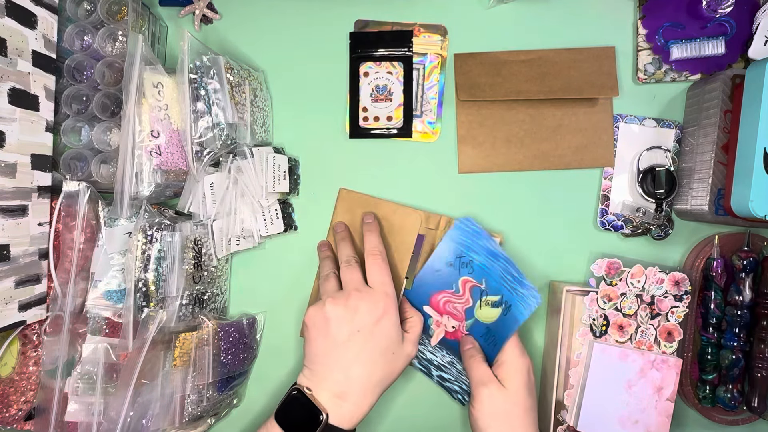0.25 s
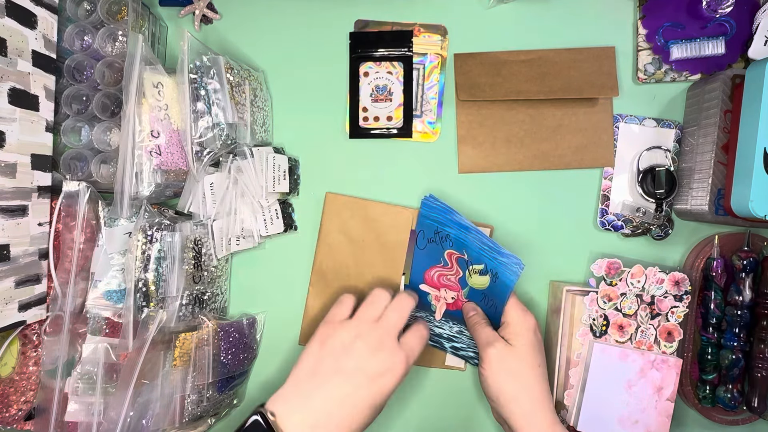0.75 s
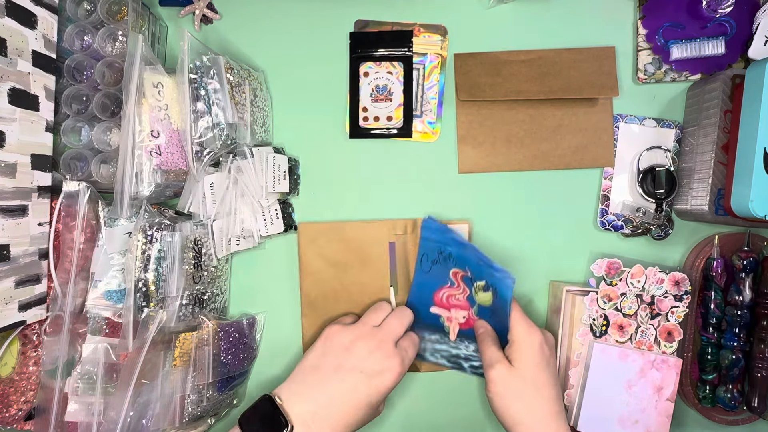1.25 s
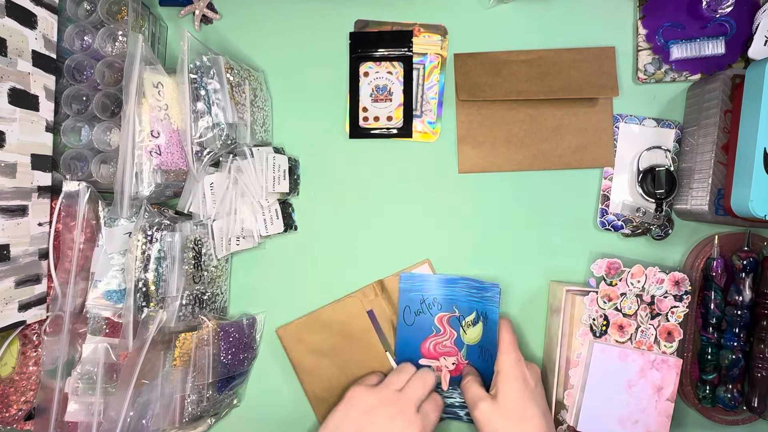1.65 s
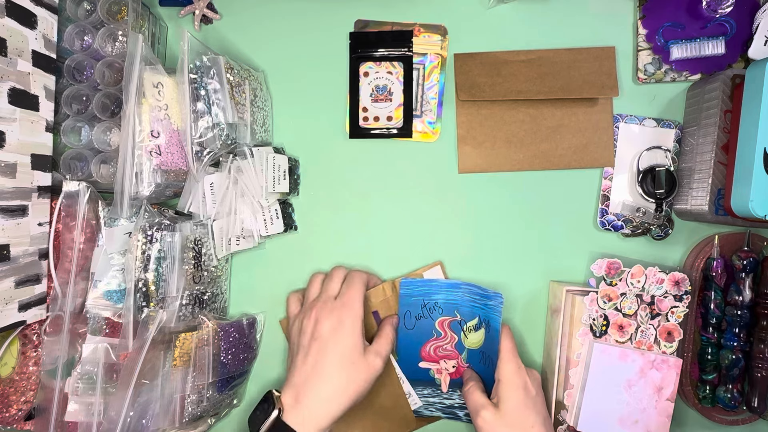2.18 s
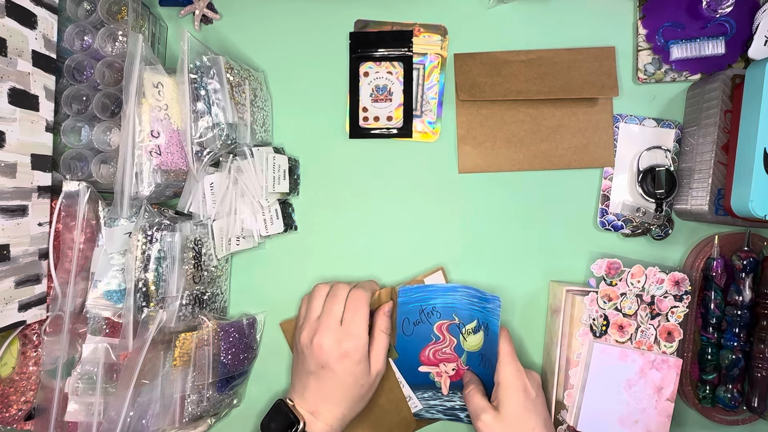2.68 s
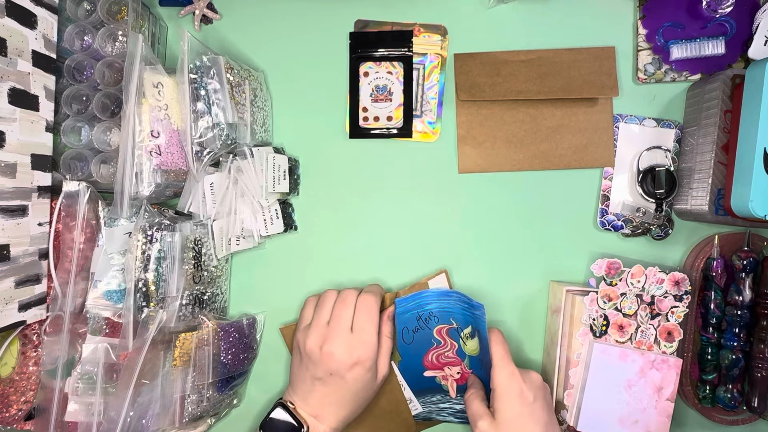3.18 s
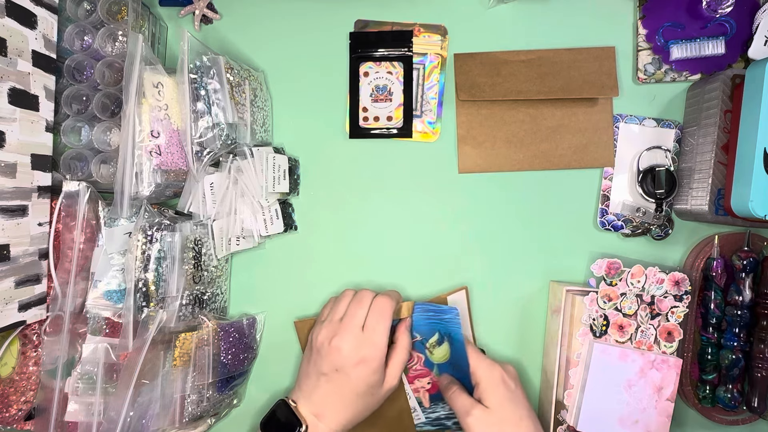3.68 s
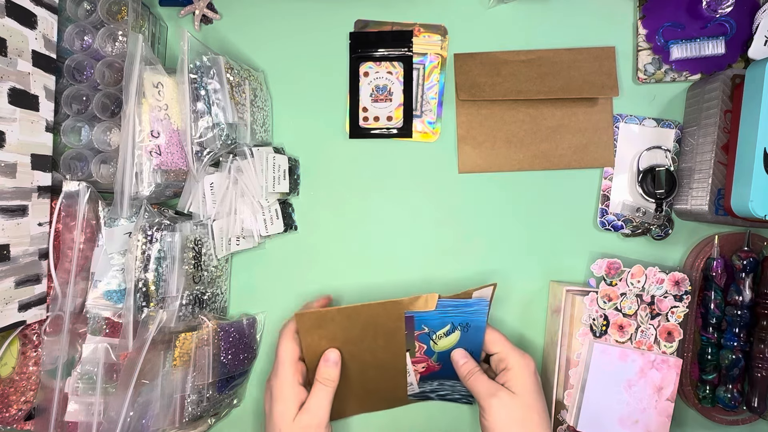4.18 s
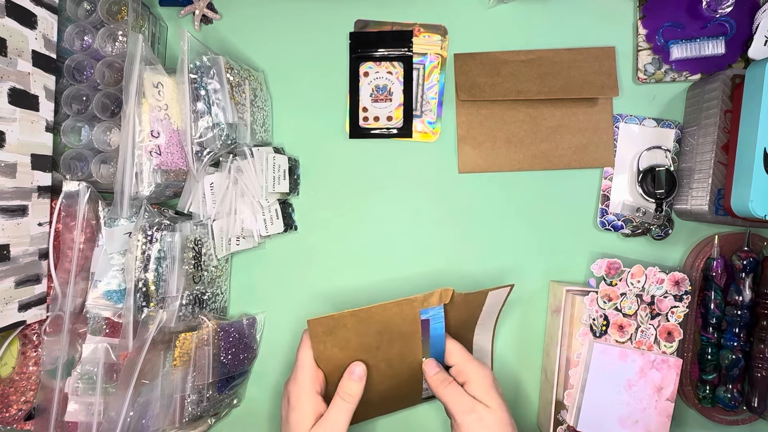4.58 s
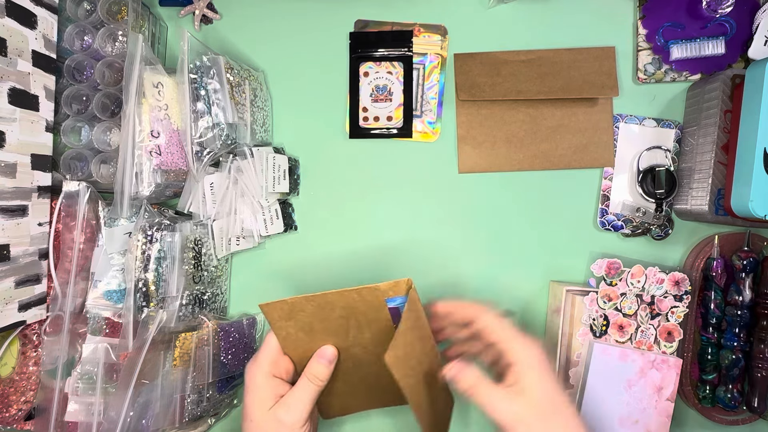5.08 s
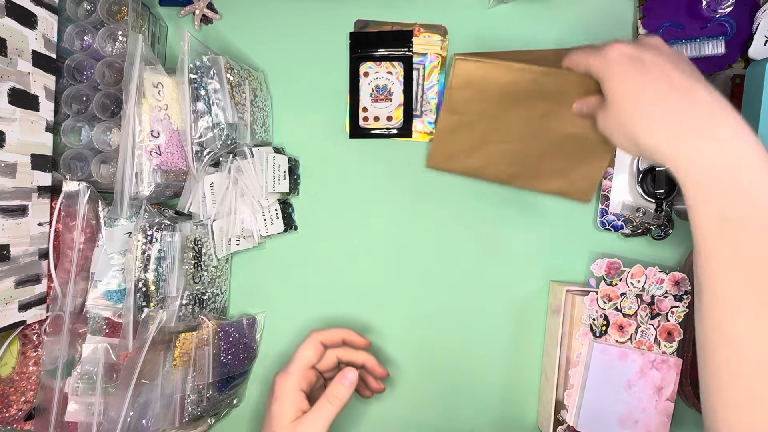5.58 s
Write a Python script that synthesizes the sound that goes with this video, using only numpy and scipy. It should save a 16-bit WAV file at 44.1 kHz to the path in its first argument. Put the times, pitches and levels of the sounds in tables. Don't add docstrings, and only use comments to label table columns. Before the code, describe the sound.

A quiet small room with a steady low fan hum and soft ventilation rumble throughout. Close above a desk, stiff cards are lined up with a paper envelope: grainy dry scrapes in short uneven strokes from 0 to 1.7 s, with faint creases and bright edge flicks near 0.5, 1.0 and 1.3 s. A soft low wrist thud falls at about 1.9 s, then a crisp crease snap at 2.1 s and gentler crumpling to 3 s, with a thin flick at 2.8 s. At 3.25 s a bright sharp flick and bend begin the push; sliding rustles continue, swelling to the loudest crack at about 4.46 s. Firm folds and dull knocks follow from 4.65 to 4.95 s, the stiff paper ringing briefly and hollowly. A tiny low puff sounds at 5.1 s as it closes. Light rustle fades, and small taps at 5.66 to 5.77 s mark the envelope being put down.

```python
import sys
import numpy as np
from scipy import signal
from scipy.fft import rfft, irfft, next_fast_len
from scipy.io import wavfile
from scipy.ndimage import uniform_filter1d

SR = 44100
rng = np.random.default_rng(int(sys.argv[2]) if len(sys.argv) > 2 else 0)


def master(y):
    cut = np.clip(np.atleast_2d(y).T, -1, 1)
    pcm = np.round(cut * 32767)
    wavfile.write(sys.argv[1], SR, pcm.astype(np.int16))


def undo_db(level):
    steps = np.asarray(level, float) / 20
    return 10 ** steps


N = 257981


def evened(x):
    return x / np.sqrt(np.mean(x ** 2) + 1e-20)


def read(points, hz):
    f, value = np.transpose(points)
    return np.interp(np.log(hz + 1), np.log(f + 1), value)


def coloured(x, points):
    size = next_fast_len(N)
    gain = undo_db(read(points, np.fft.rfftfreq(size, 1 / SR)))
    return evened(irfft(rfft(x, size) * gain, size)[:N])


def resonate(x, hz, width):
    r = np.exp(-np.pi * width / SR)
    return 2 * signal.lfilter([1 - r], [1, -r * np.exp(2j * np.pi * hz / SR)], x).real


def add(mix, s, sound):
    part = mix[..., round(s * SR):][..., :sound.shape[-1]]
    part += sound[..., :part.shape[-1]]


# [f/Hz, level/dB, halo width/Hz, steady share]
HUM = [(41.75, -60, 1.1, .1), (59.65, -52, 4.8, 13), (119.46, -48.5, 7.8, 2.8), (93.4, -55.5, 8.2, 0.25),
       (150, -57.5, 15.8, 0.058)]


def hum():
    t = np.arange(N) / SR
    out = 0
    for hz, db, width, steady in HUM:
        halo = resonate(rng.standard_normal(N), hz, width)
        halo = evened(resonate(halo, hz, 3 * width))
        tone = np.sin(2 * np.pi * (hz * t + rng.random()))
        out = out + undo_db(db) * evened(steady * tone + halo)
    return out * undo_db(np.array([[-1.1], [1.1]]))


# [f/Hz, level per Hz/dB]
AIR = [(15, -25), (25, 4.5), (137, -7), (175, -11.5), (405, -21), (887, -30.5), (1500, -22), (2600, -38),
       (6200, -40.5), (8000, -52), (12500, -58)]
AIR_DB = -48.5
# [f/Hz, likeness 0-1]
SAME = [(40, 1), (130, 0.7), (290, 0.61), (640, 0.043), (3000, 0.11), (15000, .05)]


def air():
    size = next_fast_len(N)
    hz = np.fft.rfftfreq(size, 1 / SR)
    a, b = rfft(rng.standard_normal((2, size)))
    same = np.clip(read(SAME, hz), 0, 1)
    right = same * a + np.sqrt(1 - same ** 2) * b
    z = np.array([a, right]) * undo_db(read(AIR, hz))
    return undo_db(AIR_DB) * evened(irfft(z, size)[:, :N])


# [peak t/s, effort level/dB, rise/s, fall/s, edge sharpness/dB]
LINING_UP = [(0.0, -55, 0.1, 0.08, -2), (0.085, -47, 0.066, 0.11, -5), (0.39, -56.5, 0.37, 0.18, -8),
             (0.537, -47, 0.036, 0.012, 2), (0.63, -57, 0.089, 0.059, 1.5), (0.815, -51, 0.047, 0.097, -11),
             (0.918, -54, 0.013, 0.098, -0.5), (1.025, -45.5, 0.012, 0.036, -17),
             (1.12, -55.5, 0.049, 0.61, -0.5), (1.30, -54, 0.042, 0.039, -2),
             (1.475, -61.5, 0.016, 0.08, -8), (1.525, -46, 0.057, 0.11, -8), (1.6, -48.5, 0.093, 0.025, -7),
             (1.66, -60.5, 0.021, 0.033, 9.5), (2.07, -58, 0.14, 0.051, 2.5), (2.15, -58, 0.024, 0.32, -3),
             (2.328, -53.5, 0.034, 0.19, -1), (2.56, -58.5, 0.063, 0.073, -6),
             (2.691, -58, 0.087, 0.061, 2), (2.794, -54, 0.004, 0.006, 21), (2.87, -63, 0.14, 0.39, -38),
             (3.029, -58, 0.15, 0.041, -7.5), (1.9, -68, 0.011, 0.067, -5), (1.975, -63.5, 0.014, 0.05, 1)]
PUSHING_IN = [(3.251, -45, 0.016, 0.045, -15), (3.31, -60.5, 0.069, 0.23, -34),
              (3.448, -50, 0.045, 0.15, 0.5), (3.58, -51, 0.07, 0.037, -5), (3.70, -50, 0.19, 0.14, -6.5),
              (3.84, -56, 0.025, 0.11, 0), (4.27, -55.5, 1, 0.099, -9.5), (4.35, -53.5, 0.065, 0.093, 5.5),
              (4.419, -40.5, 0.1, 0.066, -3.5), (4.48, -44.5, 0.035, 0.038, -5.5),
              (4.63, -58.5, 0.33, 0.066, -21), (4.76, -49.5, 0.081, 0.1, 1.5),
              (4.82, -51.5, 0.13, 0.12, -29), (5.107, -53, 0.0042, 0.022, -5), (5.159, -54, 0.042, .1, -3),
              (5.38, -62, 0.18, 0.33, -6.5), (5.67, -58.5, 0.018, 0.11, -4),
              (5.771, -61.5, 0.094, 0.17, -4), (3.905, -56.5, 0.021, 0.029, 1),
              (3.231, -45.5, 0.011, 0.023, -1)]
SWELL_DB, SWELL_ROUND, REST_DB = -17, 1.255, -90


def strokes():
    t = np.arange(0, N + 64, 64) / SR
    s, db, rise, fall, edge_db = np.array(LINING_UP + PUSHING_IN).T[..., None]
    away = np.where(t < s, (s - t) / abs(rise), (t - s) / abs(fall))
    swell = undo_db(db + np.maximum(SWELL_DB * away ** SWELL_ROUND, -120))
    curves = (swell, swell * undo_db(edge_db))
    return [np.interp(np.arange(N) / SR, t, e.sum(0) + undo_db(REST_DB)) for e in curves]


def slips(per_s, spread_db, clump_db):
    size = undo_db(spread_db * np.minimum(rng.exponential(1, N), 4)) * rng.choice([-1, 1], N)
    clumps = uniform_filter1d(rng.standard_normal(N), size=300)
    clumps = evened(uniform_filter1d(clumps, size=300))
    return evened(size * (rng.random(N) < per_s / SR)) * undo_db(clump_db * clumps)


def wide(points, alike, **grain):
    near, far = slips(**grain), slips(**grain)
    right = alike * near + np.sqrt(1 - alike ** 2) * far
    return np.array([coloured(near, points), coloured(right, points)])


def patchy(x):
    z = signal.stft(x, nperseg=256)[2]
    field = uniform_filter1d(rng.standard_normal(z.shape[1:]), size=3, axis=0)
    field = uniform_filter1d(field, size=14, axis=1)
    patch_db = 2.5 * evened(field)
    return evened(signal.istft(z * undo_db(patch_db), nperseg=256)[1][:, :N])


# [f/Hz, level per Hz/dB]
FIBRE = [(600, -79), (1000, -11.5), (1250, -2), (1900, -1.5), (2500, -4), (3000, -6.5), (4800, -7.5),
         (6300, -6.5), (8800, -16.5), (10000, -25)]
EDGE = [(7000, -12.5), (9000, 8.5), (10100, -2), (11200, 0.5), (12500, -6), (13600, 2.5), (14600, -5),
        (16000, -6)]
SHEET = [(150, -30), (300, -6), (600, 0), (1100, -1), (1500, -10), (2500, -30)]
# [t/s, grip level/dB]
GRIP = [(0, -51), (.8, -50.5), (1.3, -54.5), (1.8, -49.5), (2.3, -51.5), (2.9, -51.5), (3.4, -51.5),
        (4.0, -51), (4.4, -53), (4.7, -44), (5.0, -46), (5.3, -44), (5.6, -50), (5.85, -55)]
SHEET_FOLLOWS = 0.53


def scrape(effort, pressure):
    grip_db = np.interp(np.arange(N) / SR, *np.transpose(GRIP))
    fibres = patchy(wide(FIBRE, alike=0.17, per_s=6000, spread_db=2.4, clump_db=1.4)) * undo_db(2.0)
    edge = coloured(slips(per_s=3800, spread_db=-7.0, clump_db=1.5), EDGE)
    sheet = wide(SHEET, alike=0.19, per_s=2100, spread_db=0.6, clump_db=2.0) * undo_db(grip_db - 6.5)
    flex = (effort / undo_db(-49.0)) ** SHEET_FOLLOWS
    return effort * fibres + pressure * edge + flex * sheet


# [start t/s, length/s, ring level above effort/dB, first f/Hz, last f/Hz]
POCKET = [(0.034, 0.18, 9, 1440, 1380), (0.47, 0.084, -12, 2000, 2200), (0.769, 0.045, 15, 1600, 1510),
          (0.805, 0.066, 13.5, 2050, 2100), (1.289, 0.045, 6, 1580, 1420), (1.452, 0.18, -1, 2270, 1810),
          (3.35, 0.2, 8.5, 1740, 1530), (3.6, 0.28, 9, 1570, 1780), (4.26, 0.24, 8, 2570, 2590),
          (4.789, 0.07, 15.5, 1290, 1240), (0.908, 0.06, 4, 4540, 4660), (1.124, 0.05, 13, 4900, 4860),
          (1.285, 0.04, 1, 5100, 5000), (1.462, 0.037, 11, 2300, 2500), (1.563, 0.062, 8.5, 4630, 4700),
          (2.12, 0.06, 5, 5100, 4900), (4.755, 0.069, 12, 2510, 2650), (0.04, 0.074, 1, 2400, 2280),
          (0.24, 0.18, 7, 1320, 1290), (0.2, 0.25, 9.5, 2900, 2830), (2.127, 0.12, 13, 1490, 1450),
          (2.245, 0.47, 10.5, 1300, 1250), (2.503, 0.14, 9, 2500, 2450), (2.75, 0.35, 7.5, 1280, 1290),
          (2.736, 0.2, 13.5, 2030, 1930), (2.85, 0.11, 11.5, 2550, 2680), (3.43, 0.33, 4, 2620, 2600),
          (4.69, 0.36, 12, 2000, 2000), (4.28, 0.13, -7, 1280, 1330)]


def pocket(effort):
    out = np.zeros(N)
    rub = slips(per_s=1800, spread_db=2.8, clump_db=1.6)
    for s, length, db, first_hz, last_hz in POCKET:
        span = slice(round(s * SR), round((s + length) * SR))
        glide_hz = np.linspace(first_hz, last_hz, len(rub[span]))
        turn = np.exp(2j * np.pi * np.cumsum(glide_hz) / SR)
        ring = (turn * signal.lfilter(*signal.butter(2, 130, fs=SR), rub[span] / turn)).real
        fade = signal.windows.tukey(len(ring), .25)
        add(out, s, evened(ring) * effort[span] * undo_db(db - 13.0) * fade)
    return out


def burst(chance, hz, fall_db, width_share, rise_s):
    t = np.arange(len(chance)) / SR
    fall_db = max(fall_db, 3)
    fall = undo_db(-fall_db * t / 0.007) + 0.061 * undo_db(-fall_db * t / 0.13)
    blow = chance * fall * np.minimum(t / rise_s, 1)
    ring = resonate(resonate(blow, hz, width_share * hz), hz, 2.9 * hz)
    ring = ring + 0.17 * resonate(blow, min(1.53 * hz, 15000), .5 * hz)
    return ring / abs(ring).max()


def snaps(table, fall_db, rise_s):
    out = np.zeros((2, N))
    rattle = rng.standard_normal((len(table), 5000))
    give = 8.6 * signal.unit_impulse(5000, idx=30)
    for noise, (s, db, hz, pan_db) in zip(rattle + give, table):
        sound = undo_db(db - 3.0) * burst(noise, hz, fall_db, width_share=0.23, rise_s=rise_s)
        add(out, s - .0007, sound * undo_db(np.array([[pan_db / 2], [-pan_db / 2]])))
    return out


# [t/s, peak level/dB, ring f/Hz, left-right level/dB]
SNAPS = [(0.0568, -34.5, 1300, 9.5), (0.35, -41, 1330, -10), (0.7632, -48, 1550, -17),
         (0.818, -31.5, 2160, -8), (0.8265, -33, 1960, -12), (1.0249, -42, 1920, -7),
         (1.4655, -36, 1890, -1), (1.521, -29.5, 1820, 4), (1.675, -39.5, 2100, -15),
         (2.1038, -17, 1480, 1), (2.1115, -26.5, 1400, -9), (2.2381, -33, 1110, -4),
         (2.3992, -31, 2000, -4), (3.2306, -26, 2320, 0), (3.2472, -25.5, 1310, -6),
         (3.2553, -23.5, 1790, -10), (3.7345, -28.5, 1510, -1), (3.5862, -25, 1360, -3),
         (3.8022, -27.5, 1610, -4), (4.4135, -29, 2520, -6), (4.4618, -17.5, 1400, -3),
         (4.4634, -9.5, 2580, -7.5), (4.4697, -24, 1930, 4), (4.7312, -25.5, 1930, -1),
         (4.7715, -27, 2500, 0), (4.8125, -22.5, 1320, 7), (4.82, -18.5, 1310, -7),
         (4.9551, -37.5, 1050, -5), (5.034, -42, 1440, -10), (5.1058, -38, 1270, 4),
         (5.66, -33, 1050, -17.5)]
TICKS = [(1.1, -41, 1300, -10), (1.4791, -33, 2370, -2), (1.3, -42, 1500, -2), (2.1215, -46, 1450, -2),
         (2.139, -45, 1500, -2), (2.5, -35, 1500, -4), (2.8, -43, 1500, -2), (2.249, -39, 1150, 1),
         (3.2, -48, 1250, -2), (1.8, -42, 1300, -4), (3.2, -42, 1230, -9), (2.5, -40, 2000, -3),
         (2.865, -38.5, 1300, -8), (3.272, -34, 1030, 3), (3.2, -28, 1310, -8), (4.662, -27.5, 1390, -6),
         (4.8164, -30, 2720, 7), (0.764, -41, 2300, 0), (5.6585, -34, 3050, -11), (4.4623, -16, 2060, 0),
         (4.477, -28, 2200, 0), (0.95, -31, 3040, 0), (4.9, -36, 2550, 0), (4.357, -33, 2900, 0),
         (7.8, -40, 3000, -6), (4.668, -26.5, 2370, 0), (4.828, -25.5, 1280, -3), (0.528, -37, 2500, -3),
         (0.533, -40, 2100, -1), (0.353, -46, 2050, -3), (0.33, -34, 2500, -2), (0.44, -38.5, 2700, -5),
         (0.098, -45, 2350, -3), (2.688, -35, 2550, -2), (4.5, -38, 3600, -2), (2.796, -36, 3600, -9),
         (4.4636, -15, 2200, 0), (4.4627, -31, 3800, -2), (4.4705, -31, 3900, -4), (4.4785, -36, 2700, -3),
         (5.112, -36, 1250, -4), (4.768, -28, 1340, -10), (1.8915, -48, 2700, -3), (0.86, -42, 2200, 3),
         (1.296, -44, 2000, -3), (0.84, -38, 2200, -4)]
CRUMPLES = [
    (1.5696, -38.5, 1770, -18),
    (2.2123, -31.5, 1400, -4),
    (2.3171, -42, 1330, -5),
    (2.684, -30.5, 1630, -3.5),
    (2.795, -44, 1420, -13),
    (3.0281, -45.5, 1450, -7),
    (3.2375, -29.5, 1480, 5),
    (4.6654, -27, 1980, -2),
    (5.7483, -41.5, 1390, -8),
    (5.76, -57, 1370, 6),
]


def creases():
    quick = snaps(SNAPS + TICKS, fall_db=23, rise_s=0.00085)
    slow = snaps(CRUMPLES, fall_db=6.5, rise_s=0.0017)
    return quick + slow


# [f/Hz, level/dB, width/Hz]
BODY = [(1110, -6.5, 22), (1242, 2.5, 19), (1390, -2, 19), (1530, -4, 64), (1870, -24, 14), (2000, 6, 7.3),
        (2090, -12.5, 20), (2320, -9, 55), (2520, -7, 140), (2690, -12, 23), (2930, -5, 63)]


def body(x):
    return sum((-1) ** k * undo_db(db) * resonate(x, hz, width) for k, (hz, db, width) in enumerate(BODY))


def hits(table, width_share, rise_s, boost_db):
    out = np.zeros(N)
    chance = rng.standard_normal((len(table), 5000))
    for noise, (s, db, hz, fall_db) in zip(chance, table):
        sound = burst(noise, hz, fall_db, width_share, rise_s)
        add(out, s - rise_s, undo_db(db + boost_db) * sound)
    return out


# [t/s, peak level/dB, centre f/Hz, fall per 7 ms/dB]
FLICKS = [(0.5259, -35, 6540, 15), (0.8148, -40, 6100, 20), (0.827, -57, 6290, 20),
          (1.0238, -29.5, 7100, 12), (1.295, -27, 5200, 10), (1.5174, -51, 4630, 11),
          (1.6683, -37, 4550, 14), (1.9834, -47.5, 8800, 13), (2.104, -23.5, 4930, 57),
          (2.6827, -36, 4700, 5), (2.7912, -27, 9800, 35), (2.7955, -27, 8700, 37), (2.797, -34, 4900, 25),
          (3.2281, -39, 7400, 11), (3.2479, -14, 4800, 26), (3.2584, -46, 4100, 18),
          (3.5858, -42, 4420, 18), (4.4608, -46, 4020, 18), (5.1043, -55, 5160, 15),
          (5.105, -44, 12800, 15), (5.145, -39.5, 12800, 4.5), (5.142, -43.5, 4600, 10),
          (5.659, -42.5, 5600, 0), (2.798, -36, 5150, 24), (2.812, -50, 5200, 5), (2.7955, -30, 12900, 34),
          (1.0240, -38, 13500, 30), (1.8915, -58, 6000, 10), (1.9652, -50, 8500, 10),
          (2.0076, -50, 9000, 9), (3.2285, -45, 12700, 25), (3.2475, -36, 11500, 37),
          (5.7489, -44, 3400, 6), (1.2947, -42, 12500, 15)]


def flicks():
    return hits(FLICKS, width_share=0.18, rise_s=0.00067, boost_db=0.5)


# [t/s, peak level/dB, ring f/Hz, fall per 7 ms/dB]
KNOCKS = [(0.826, -42.5, 754, -1), (1.518, -42, 884, 0), (1.9, -50, 228, 1), (1.938, -48, 270, 1),
          (2.238, -49.5, 251, 32), (3.246, -52, 932, 13), (3.590, -43, 745, 9), (3.8, -41.5, 624, 13),
          (4.417, -34, 704, 17), (4.465, -30.5, 570, 17), (4.667, -34.5, 696, 8), (4.729, -38.5, 416, 16),
          (4.774, -38, 279, 5), (4.818, -31.5, 664, 11), (4.893, -38, 533, 11), (4.954, -42, 477, -1),
          (5.034, -40.5, 600, 5), (5.661, -35.5, 795, 22), (5.680, -43.5, 473, 13), (5.749, -47, 420, 10),
          (5.784, -44, 290, 1), (1.9, -53, 620, 4), (1.99, -48, 626, 3), (4.46, -43, 283, 13),
          (5.662, -43, 445, 13)]


def knocks():
    return hits(KNOCKS, width_share=0.31, rise_s=0.00226, boost_db=1.5)


# [t/s, peak level/dB, ring f/Hz, fall per 7 ms/dB]
THUDS = [
    (1.93, -39, 150, -1),
    (5.77, -51, 143, -2.5),
]


def thuds():
    return hits(THUDS, width_share=0.06, rise_s=0.01, boost_db=-1.5)


# [start t/s, length/s, level/dB, f/Hz]
PUFFS = [
    (5.112, 0.031, -39, 415),
    (5.754, 0.014, -50, 1400),
]


def puffs():
    out = np.zeros(N)
    for s, length, db, hz in PUFFS:
        t = np.arange(0, length, 1 / SR)
        waver = evened(uniform_filter1d(rng.standard_normal(len(t)), size=200))
        turns = np.cumsum(hz * (1 + 0.074 * waver)) / SR
        swell = np.sin(np.pi * t / length) ** 0.54
        add(out, s, undo_db(db) * swell * np.sin(2 * np.pi * turns))
    return out


# [f/Hz, left lead/rad]
PORTS = [(300, 0), (1400, -.15), (2400, -.6), (3400, -2.6), (5300, -3.1), (6300, -6.2), (7600, -6.4),
         (9100, -3.8), (10000, -np.pi), (11800, 0), (12900, 0), (14200, np.pi), (16500, np.pi)]
# [f/Hz, left-right level/dB]
TILT = [(60, -1), (350, -3), (2000, -4.5), (2800, 0), (4500, -5), (6000, -1.5), (8500, 1), (12000, 0)]


def ports(x):
    size = next_fast_len(N)
    hz = np.fft.rfftfreq(size, 1 / SR)
    half = undo_db(read(TILT, hz) / 2) * np.exp(.5j * read(PORTS, hz))
    return irfft(rfft(x, size) * np.array([half, 1 / half]), size)[:, :N]


# [f/Hz, t60/s]
ROOM = [(200, 0.35), (1000, 0.076), (4000, 0.15), (12000, 0.036)]


def room(x):
    taps = np.zeros((2, SR // 2))
    grid = np.arange(150, SR // 2 - 20, 20)
    at = grid + rng.integers(0, 20, (2, len(grid)))
    np.put_along_axis(taps, at, rng.choice([-1., 1.], at.shape), 1)
    hz, t, z = signal.stft(taps, SR, nperseg=128)
    tail = signal.istft(z * undo_db(-60 * t / read(ROOM, hz)[:, None]), SR, nperseg=128)[1]
    return signal.fftconvolve(x, tail / np.linalg.norm(tail[0]), axes=1)[:, :N]


def scene():
    effort, pressure = strokes()
    rub = scrape(effort, pressure) + pocket(effort)
    folds = creases()
    ringing = body(undo_db(0.5) * folds + undo_db(-14.5) * rub)
    paper = rub + folds + ringing + flicks() + knocks() + puffs()
    dulled = signal.lfilter(*signal.butter(4, 11200, fs=SR), paper)
    echo = room(dulled) * undo_db(-9.5)
    return ports(paper) + echo + thuds() + hum() + air()


def roll_off(x):
    return signal.sosfilt(signal.butter(12, 16500, fs=SR, output="sos"), x)


# [f/Hz, level/dB]
MIC = [(20, -50), (28, -26), (35, 0), (15700, 0), (15950, -22), (16500, -30)]


def record(dry):
    size = next_fast_len(N)
    gain = undo_db(read(MIC, np.fft.rfftfreq(size, 1 / SR)))
    heard = irfft(rfft(dry, size) * gain, size)[:, :N]
    return roll_off(heard)


dry = scene()
out = record(dry)
master(out)
```